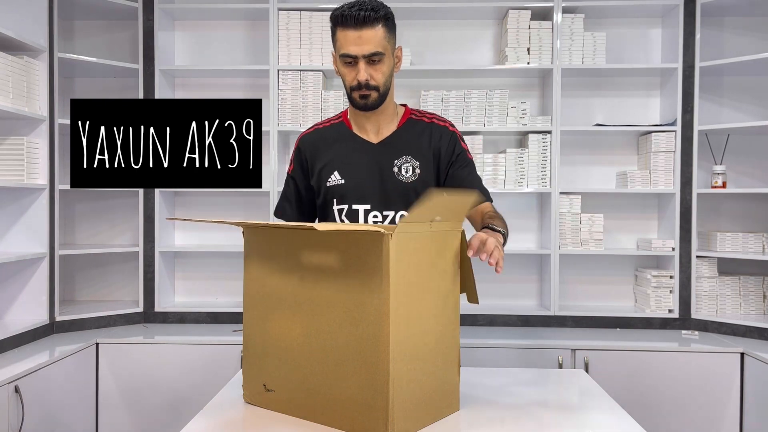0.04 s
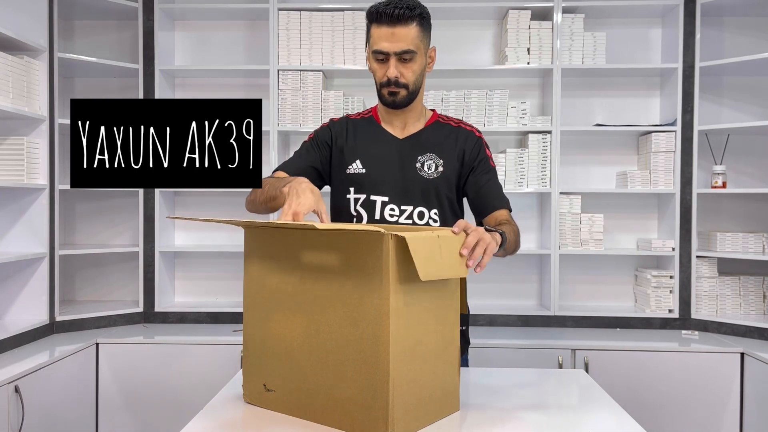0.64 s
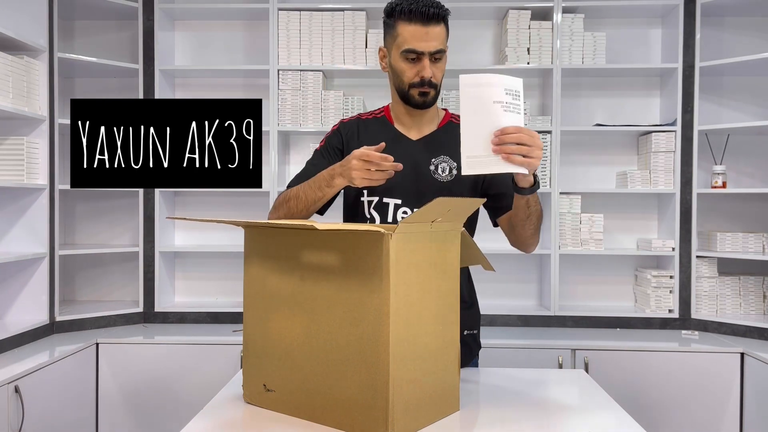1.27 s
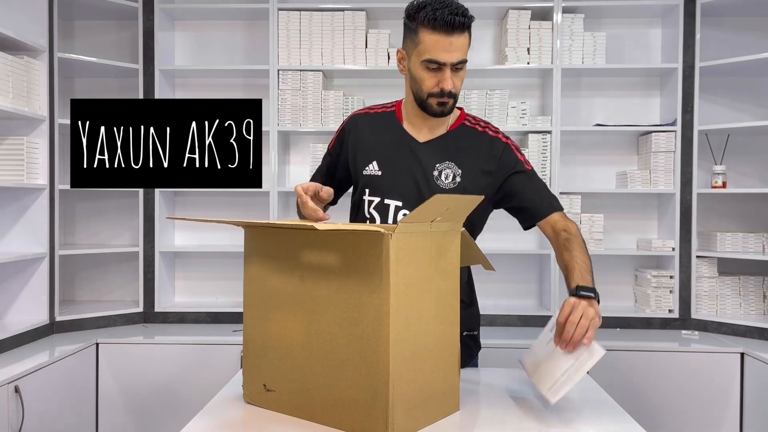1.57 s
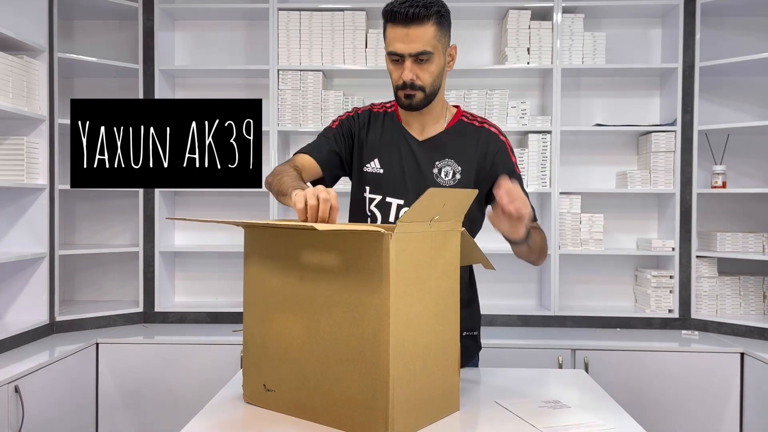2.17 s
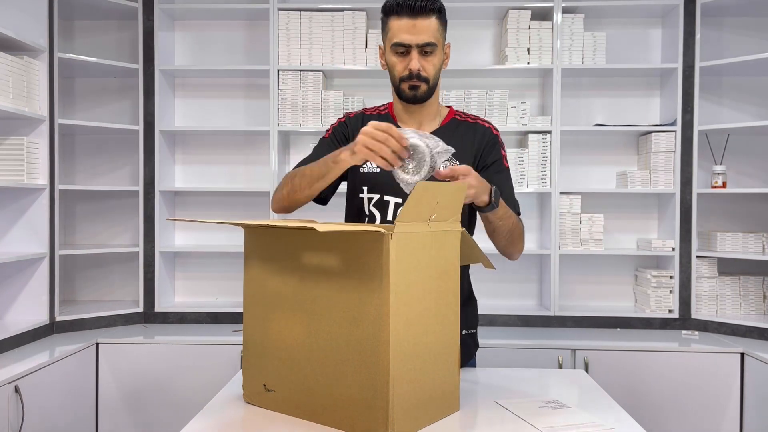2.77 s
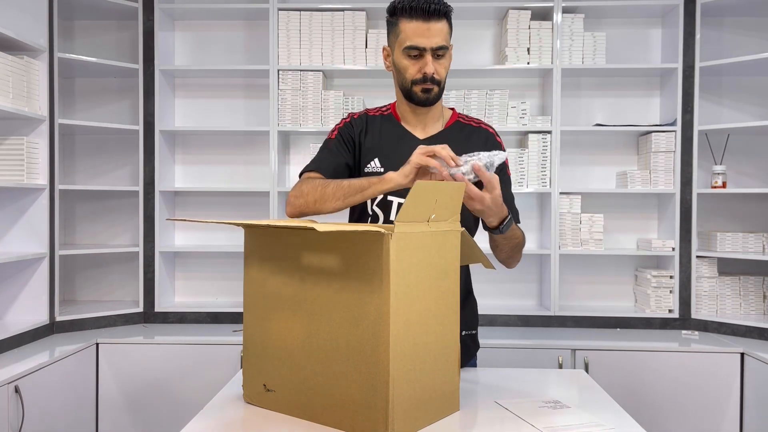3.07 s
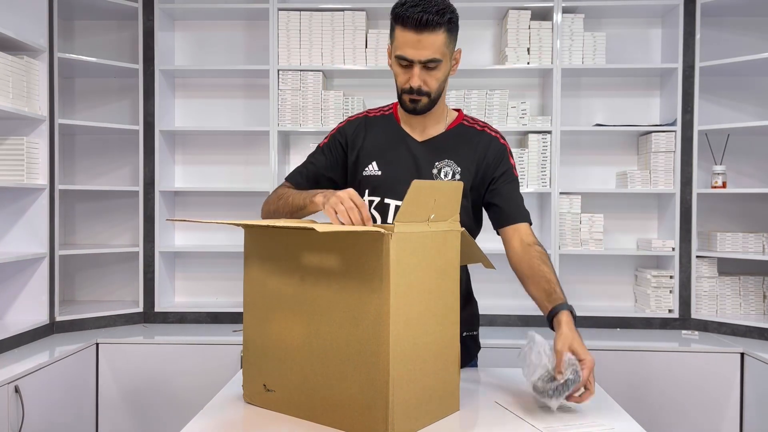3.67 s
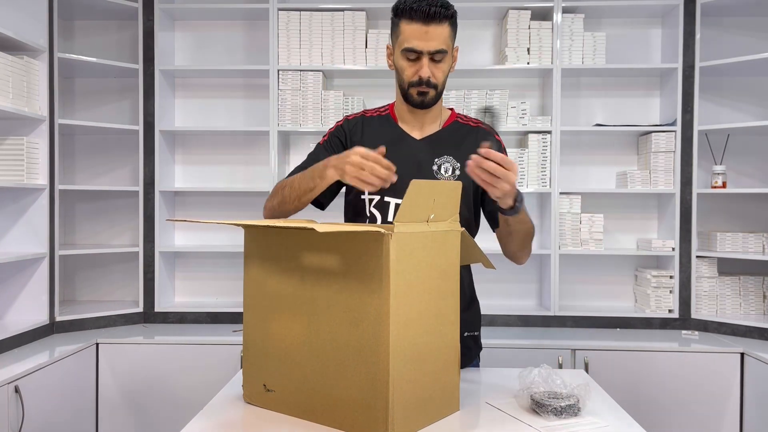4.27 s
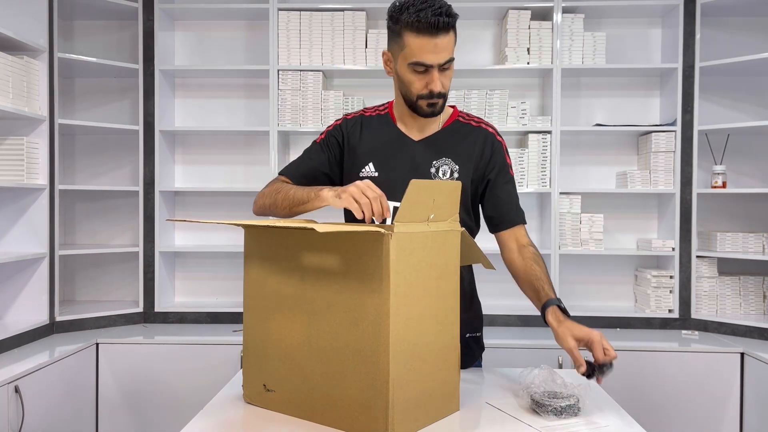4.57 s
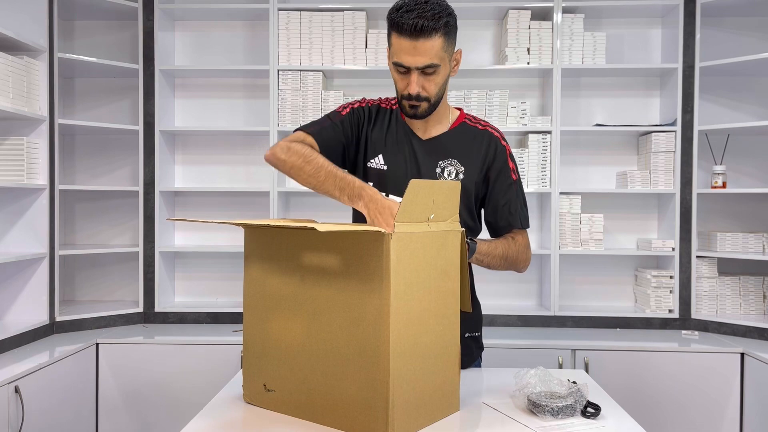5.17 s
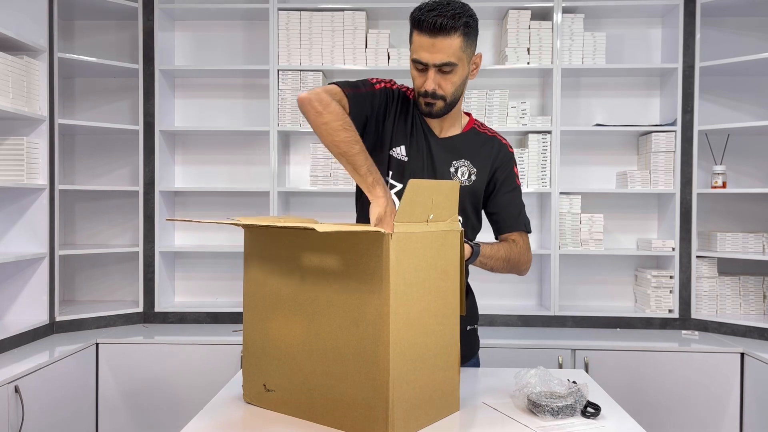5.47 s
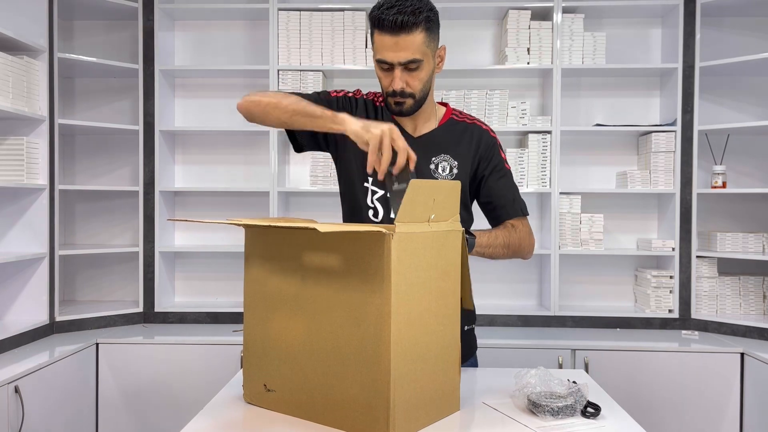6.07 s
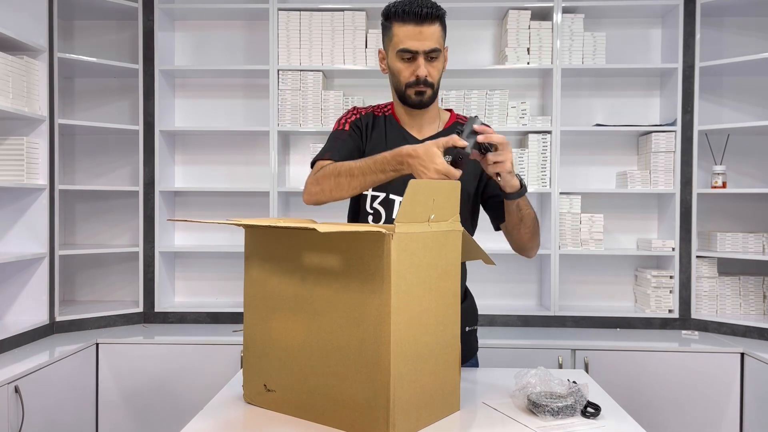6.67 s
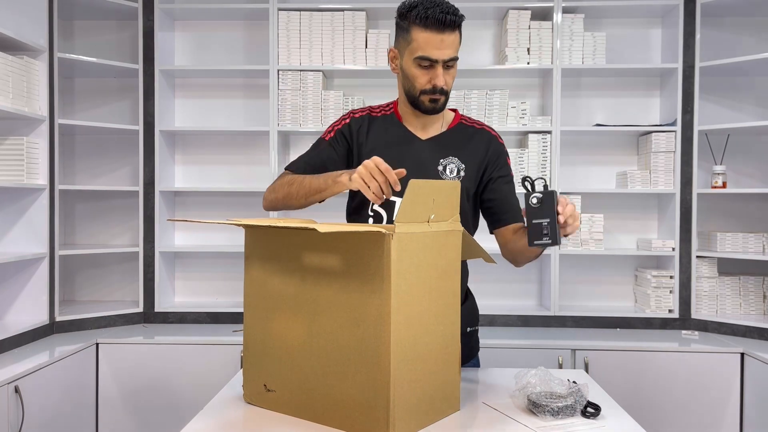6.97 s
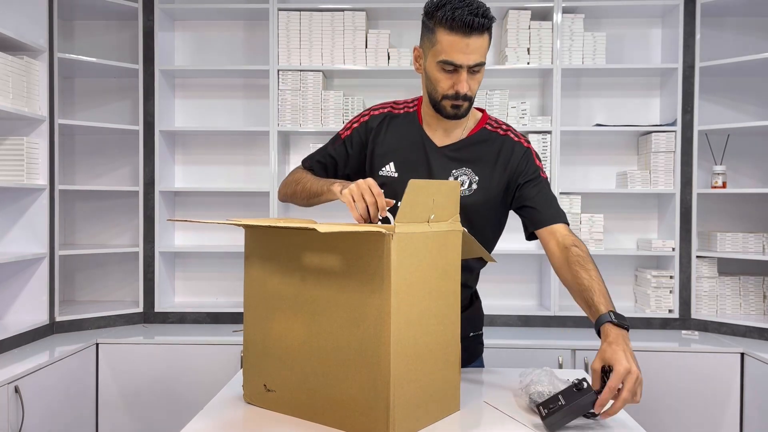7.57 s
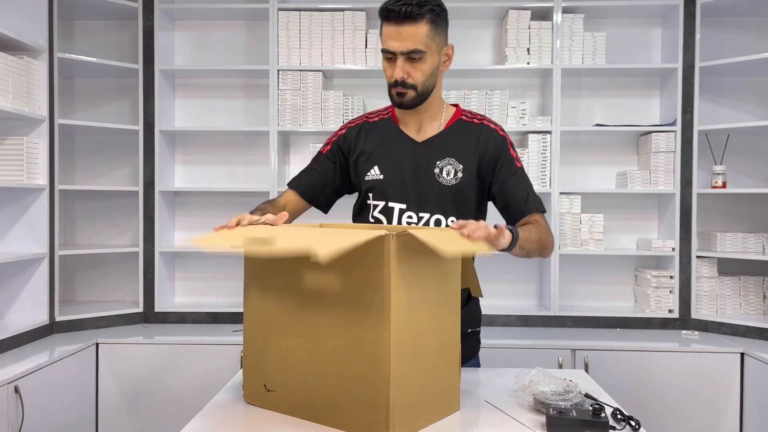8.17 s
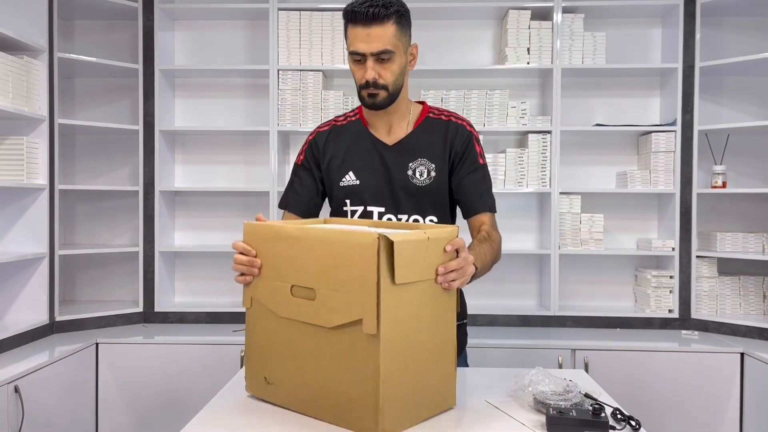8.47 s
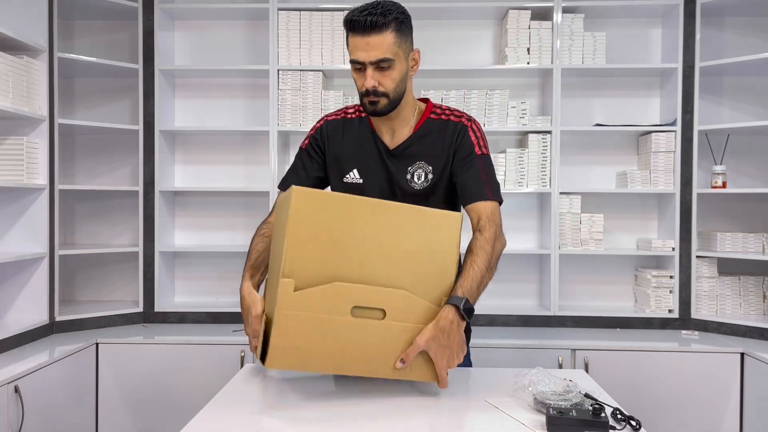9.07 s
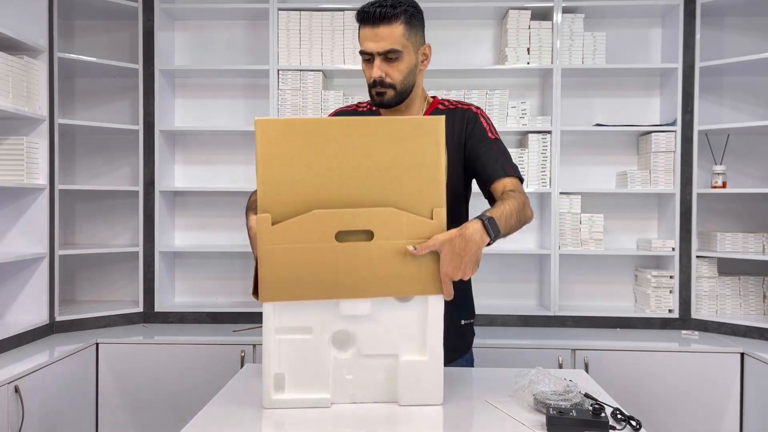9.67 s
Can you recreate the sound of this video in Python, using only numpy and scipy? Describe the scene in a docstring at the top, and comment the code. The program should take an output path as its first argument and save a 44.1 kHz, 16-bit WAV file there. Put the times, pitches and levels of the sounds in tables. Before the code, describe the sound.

A cardboard box is unpacked nearby in a small, hard-walled room, with a faint, low appliance hum throughout. Flaps snap and scrape during the first second, followed by light ticks and soft table bumps around 1.7 seconds. From 2.1 to 3.9 seconds a plastic bag rustles and crinkles, and the loudest knock comes at 3.7 seconds as a part lands on the table. Small clicks and bumps follow near 4.7 seconds. From 5 to 6.5 seconds cardboard rubs and scrapes with hollow knocks and a sharp snap at 6.2. Parts clunk onto the table several times between 7.4 and 7.8 seconds. From 8 seconds the card scrapes and slaps as the box is turned over, landing with a thud at 9.2. It then slides off its foam block with a dry hiss and faint high squeaks, ending with a tick near 9.9 seconds.

```python
"""A small, hard-walled shop with a humming appliance, where a cardboard box is unpacked on a table.
Flaps scrape by stick-slip friction and snap, ringing the box; a plastic bag rustles as its creases pop.
Parts are set down and send bending waves through the table top.
At last the box is turned over, lands with a thud and slides up off its foam block."""
import sys
import numpy as np
from scipy import signal
from scipy.fft import rfft, irfft, next_fast_len
from scipy.io import wavfile
from scipy.ndimage import uniform_filter1d

SR = 44100
rng = np.random.default_rng(int(sys.argv[2]) if len(sys.argv) > 2 else 0)


def bounce(signal):
    """Save signal as a 16-bit WAV file at the path given by the first command-line argument."""
    frames = np.transpose(np.atleast_2d(signal))
    limited = np.clip(frames, -1, 1)
    pcm = np.round(limited * 32767).astype(np.int16)
    wavfile.write(sys.argv[1], SR, pcm)


N = 437913
SIZE = 16384  # samples per impact or room response
T, F = np.arange(SIZE) / SR, np.arange(SIZE // 2 + 1) * SR / SIZE  # s, Hz


def undb(db):
    """Decibels to gain."""
    return 10 ** (np.asarray(db) / 20)


def unit(x):
    """Scale to rms 1."""
    return x / np.sqrt(np.mean(x ** 2))


def read(points, f):
    """A (Hz, value) table read on a log-frequency axis."""
    hz, value = np.transpose(points)
    return np.interp(np.log(f + 1e-3), np.log(hz), value)


def colour(x, points):
    """Filter by a (Hz, dB) table."""
    size = next_fast_len(x.shape[-1], True)
    gain = undb(read(points, np.arange(size // 2 + 1) * SR / size))
    return irfft(rfft(x, size) * gain, size)[..., :x.shape[-1]]


def causal(db):
    """Minimum-phase response of a gain curve: nothing sounds before the blow."""
    cepstrum = irfft(np.log(undb(db)))
    fold = 1 + np.sign(SIZE / 2 - np.arange(SIZE)) * (T > 0)
    return np.exp(rfft(cepstrum * fold))


def walk(rate_hz):
    """Smooth random wander, rms 1."""
    hold = int(SR / rate_hz)
    steps = np.repeat(rng.standard_normal(N // hold + 1), hold)
    return unit(uniform_filter1d(steps, hold)[:N])


def ringing(modes):
    """Response of a body: the blow itself plus its decaying modes."""
    return 1 + sum(undb(db) / (1 + 2j * np.pi * (F - hz) * t60 / np.log(1000)) for hz, db, t60 in modes)


# Diffuse field width. Each row: frequency in Hz, side minus mid in dB.
WIDTH = [(100, -8.5), (380, -10.5), (700, -6), (1300, 1.5), (2400, -1), (4400, -4), (12000, -3.5)]

def diffuse(mid, side):
    """Left and right of a diffuse field, alike in the bass."""
    side = colour(side, WIDTH)
    return np.array([mid + side, mid - side])


# Fan air spectrum. Each row: frequency in Hz, relative level in dB.
FAN_AIR = [(18, -78.5), (30, -58), (64, -19), (79, -18.5), (102, -1), (164, -13.5), (350, -17.5),
           (379, -16.5), (420, -8.5), (532, -19), (1300, -30), (1700, -37), (2700, -39.5), (3600, -53.5),
           (4500, -47.5), (5310, -61), (6600, -56.5), (7400, -50), (8700, -63), (15500, -64)]
# Hum lines. Each row: frequency in Hz, rms level in dB, waver relative to the steady tone.
HUM = [(100.6, -50, 0.12), (416, -57, 1.17), (932, -70, 0.6), (1190, -76.5, 2.5)]

def appliance(air_db=-50.5):
    """Dull fan air and a hum that wavers in level and phase."""
    air = unit(colour(diffuse(*rng.standard_normal((2, N))), FAN_AIR)) * undb(air_db)
    time, hum = np.arange(N) / SR, np.zeros(N)
    for hz, db, waver in HUM:
        drift = 1 + waver * (walk(14) + 1j * walk(12))
        hum += undb(db) * unit(np.real(drift * np.exp(2j * np.pi * hz * time)))
    return air + hum


# Room decay. Each row: frequency in Hz, T60 in seconds.
ROOM_T60 = [(150, 0.34), (600, 0.13), (2400, 0.25), (6000, 0.21), (14000, 0.17)]
# Stereo balance of table and box. Each row: frequency in Hz, left minus right in dB.
TABLE_BALANCE = [(100, 5.5), (320, 3), (600, 0.5), (1200, 6.5), (2400, -17.5)]
BOX_BALANCE = [(150, 1.5), (600, -4), (2400, -3.5), (6000, -0.6), (12000, 1.5)]

def room(balance, wet_db, first_wall_s=0.0018):
    """Yields responses from ever new spots: direct sound, then a dense tail, longest in the bass."""
    noise = rfft(diffuse(*rng.standard_normal((2, SIZE))))
    hz, t60 = np.transpose(ROOM_T60)
    bands = np.array([irfft(noise * read(list(zip(hz, band)), F)) for band in np.eye(len(hz))])
    fades = undb(-60 * T / t60[:, None]) * np.clip(T / first_wall_s - .5, 0, 1)
    sides = np.array([causal(sign * read(balance, F) / 2) for sign in (1, -1)])
    while True:
        tail = np.einsum("bct,bt->ct", np.roll(bands, rng.integers(SIZE), axis=2), fades)
        yield sides * rfft((T == 0) + undb(wet_db) * unit(tail) / np.sqrt(SIZE))


def moving(x, spots, spot_count=16, hop=1024):
    """A moving contact: successive moments reach the room from a cycle of spots."""
    responses = [next(spots) for _ in range(spot_count)]
    out = np.zeros((2, N + SIZE))
    x, window = np.pad(x, (0, 2 * hop)), np.hanning(2 * hop)
    for k, i in enumerate(range(0, N, hop)):
        moment = x[i:i + 2 * hop] * window
        if moment.any():
            out[:, i:i + SIZE] += irfft(rfft(moment, SIZE) * responses[k % spot_count])
    return out[:, :N]


def stroke(start_s, length_s, swell_share=0.41, ease_db_per_s=26.5, release_s=0.022):
    """Force of one stroke: swells, eases off, dies as the hand lets go."""
    force, first = np.zeros(N), max(int(start_s * SR), 0)
    age = np.arange(min(SR, N - first)) / SR
    swell = np.sin(np.pi / 2 * np.minimum(age / (swell_share * length_s), 1)) ** 2
    release = np.exp(-np.clip((age - length_s) / release_s, 0, 20))
    force[first:first + len(age)] = swell * undb(-ease_db_per_s * age) * release
    return force


def effort(strokes):
    """Scrape and hiss envelopes of a run of strokes, summed in power."""
    return np.sqrt(sum(np.outer(undb(levels_db), stroke(start_s, length_s)) ** 2
                       for start_s, length_s, *levels_db in strokes))


def friction(scrape, hiss, body, surface, slips_per_s, scatter_db, judder_db, snags_per_s, snag_db):
    """Uneven slips drive the body and hiss at the surface; each random snag lets go in a flurry."""
    slips = (rng.random(N) < slips_per_s / SR) * rng.choice([-1, 1], N)
    sizes = undb(scatter_db * np.minimum(rng.exponential(size=N), 5))
    snags, flurry_s = rng.random(N) < snags_per_s / SR, 0.0046
    flurries = signal.lfilter([1], [1, -np.exp(-1 / (flurry_s * SR))], snags)
    slips = slips * sizes * undb(judder_db * walk(70)) * (1 + undb(snag_db) * flurries)
    return scrape * unit(colour(slips, body)) + hiss * unit(colour(slips, surface))


def pops(low_hz, high_hz, per_s, ring_cycles, scatter_db, size=512):
    """Creases or fibres let go one by one, each at its own pitch."""
    out = np.zeros(N + size)
    for when, pitch, chance in rng.random((int(per_s * N / SR), 3)):
        cycles = T[:size] * low_hz * (high_hz / low_hz) ** pitch
        gain = undb(scatter_db * min(-np.log(chance), 3))
        i = int(when * N)
        out[i:i + size] += gain * np.sin(2 * np.pi * cycles) * np.exp(-cycles / ring_cycles)
    return unit(out[:N])


# Tight surfaces sliding. Each row: start in seconds, length in seconds, pitch in Hz, level in dB.
SQUEAKS = [(3.544, .03, 4300, -61.5), (5.836, 0.02, 5360, -65), (8.562, 0.035, 7700, -63),
           (9.68, 0.083, 9100, -56.5), (9.837, .015, 6900, -58)]

def squeaks(relative_bandwidth=0.3):
    """Where a surface grips tightly, its friction gathers in one resonance."""
    out, slips = np.zeros(N), rng.standard_normal(N)
    for start_s, length_s, hz, db in SQUEAKS:
        peak = signal.iirpeak(hz, 1 / relative_bandwidth, fs=SR)
        tone = unit(signal.lfilter(*peak, signal.lfilter(*peak, slips)))
        out += undb(db) * stroke(start_s, length_s) * tone
    return out


# Bag handling. Each row: start in seconds, length in seconds, scrape in dB, hiss in dB.
BAG_RUBS = [(2.13, 0.13, -52, -68.5), (2.24, 0.29, -46.5, -58), (2.35, 0.086, -47, -67),
            (2.48, 0.25, -61, -62.5), (2.72, 0.29, -65, -66), (2.85, 0.11, -66, -61),
            (2.93, 0.37, -69, -64), (3.43, 0.17, -79, -67), (3.55, 0.025, -72, -59),
            (3.58, 0.081, -61, -63), (3.74, 0.066, -79, -64), (3.853, 0.027, -50.5, -69)]
# Bag scrape and hiss spectra. Each row: frequency in Hz, gain in dB.
BAG_BODY = [(100, -12), (300, 10.5), (700, 11), (1400, 0.5), (2200, 2.5), (3200, -2.5), (6000, -31)]
BAG_HISS = [(1500, -20), (3500, 2), (7500, 5.5), (10000, 1.5), (13500, 1.5), (15500, -20)]

def plastic_bag():
    """The film rubs and its creases pop."""
    scrape, hiss = effort(BAG_RUBS)
    rub = friction(scrape, hiss, BAG_BODY, BAG_HISS,
                   slips_per_s=1800, scatter_db=0.5, judder_db=2.5, snags_per_s=22, snag_db=-13)
    creases = pops(low_hz=3200, high_hz=14400, per_s=85, ring_cycles=2, scatter_db=10)
    return rub + hiss * undb(-4) * creases


# Hands and parts on card. Each row: start in seconds, length in seconds, scrape in dB, hiss in dB.
CARD_RUBS = [(.17, 0.17, -58, -62), (.355, 0.016, -68, -58.5), (.44, 0.0046, -67, -63.5),
             (.56, 0.075, -52.5, -69.5), (.64, 0.14, -59, -71.5), (1.485, .062, -69, -68.5),
             (1.57, 0.1, -70, -76), (4.38, 0.025, -59, -84), (4.855, 0.029, -66, -66.5),
             (4.92, .16, -58, -73), (5.08, 0.032, -46.5, -64), (5.205, 0.15, -45, -59),
             (5.37, .2, -47.5, -64), (5.61, 0.09, -44, -55), (5.7, 0.084, -49.5, -64),
             (5.8, 0.092, -57, -71.5), (5.94, 0.098, -42.5, -57.5), (6.08, 0.13, -51, -64),
             (6.34, 0.33, -59, -101), (7.52, 0.27, -66, -66.5), (8.04, 0.31, -55.5, -62),
             (8.23, .1, -55, -57.5), (8.29, 0.036, -45, -60), (8.35, 0.19, -56, -60.5),
             (8.575, 0.096, -55.5, -55.5), (8.66, .14, -51.5, -67), (8.79, 0.038, -60, -58.5),
             (8.862, 0.099, -47.5, -57), (8.98, 0.11, -51.5, -60), (9.08, 0.12, -51, -57),
             (9.15, 0.08, -57, -50.5)]
# Card scrape and hiss spectra. Each row: frequency in Hz, gain in dB.
CARD_BODY = [(70, -48), (135, 4.5), (300, 5), (450, 4.5), (720, -1), (1100, -4), (1500, -11.5),
             (2200, -13.5), (3500, -24), (7000, -56)]
CARD_HISS = [(1200, 2), (3000, 7), (5000, 4.5), (8000, 1), (12000, -4), (15500, -13)]
# Box panels and hollow. Each row: frequency in Hz, gain in dB, T60 in seconds.
BOX_MODES = [(132, 15, 0.45), (341, 4.5, 0.035), (418, -8, 0.1), (595, 4.5, 0.078), (736, 5, 0.098),
             (890, -3.5, 0.19), (1013, 1, 0.037), (1219, -1, 0.038), (1500, -15, .18), (1980, -3, 0.023)]

def cardboard():
    """Rubbing rings the box while fibres of the card catch."""
    scrape, hiss = effort(CARD_RUBS)
    rub = friction(scrape, hiss, CARD_BODY, CARD_HISS,
                   slips_per_s=3000, scatter_db=1.5, judder_db=3.5, snags_per_s=20, snag_db=-5.5)
    box = signal.oaconvolve(rub, irfft(ringing(BOX_MODES)))[:N]
    fibres = pops(low_hz=450, high_hz=3030, per_s=220, ring_cycles=3.5, scatter_db=2.5)
    return box + scrape * undb(-5.5) * fibres


# Box on foam. Each row: start in seconds, length in seconds, scrape in dB, hiss in dB.
FOAM_RUBS = [(9.204, 0.016, -35, -57), (9.23, 0.21, -47, -51), (9.39, 0.3, -53, -50),
             (9.57, 0.27, -52, -52.5), (9.8, 0.14, -52, -62.5)]
# Foam hiss spectrum. Each row: frequency in Hz, gain in dB.
FOAM_HISS = [(1200, 1), (3000, -0.5), (5500, -2), (9200, -2.5), (13000, -4), (15500, -9.5)]

def foam_slide():
    """The box slides off its foam block in very dense slips."""
    return friction(*effort(FOAM_RUBS), CARD_BODY, FOAM_HISS,
                    slips_per_s=16000, scatter_db=3, judder_db=1, snags_per_s=31, snag_db=-11)


def contact(cut_hz):
    """A contact of finite duration excites little above its cut-off."""
    return causal(-10 * np.log10(1 + (F / cut_hz) ** 4))


def spray(decay_s, rise_share=0.28):
    """Spectrum of tiny contacts that build as the surfaces meet, then die away."""
    age = T / max(decay_s, 1e-4)
    return rfft(rng.standard_normal(SIZE) * np.exp(-age) * (1 - np.exp(-age / rise_share)))


def add(track, start_s, spectrum, dry_peak_db, response):
    """Mix in an impact, heard through a room response."""
    start = max(int(start_s * SR), 0)
    heard = irfft(spectrum * response)[:, :N - start]
    track[:, start:start + heard.shape[1]] += heard * undb(dry_peak_db) / np.abs(irfft(spectrum)).max()


# Snaps and slaps of card, paper and plastic. Each row: start in seconds, ring in dB, ring pitch in Hz,
# tick in dB, spray decay in seconds, ring Q.
SNAPS = [(0.0334, -30.5, 1180, -32, 0.0028, 6.1), (.0343, -30, 3740, -46, 0.00087, 3.9),
         (.034, -23, 7440, -28, 0.0013, 2.3), (.043, -35, 1200, -36, 0.0021, 3),
         (.042, -35, 1920, -67, 0.0031, 5.8), (.217, -42, 2170, -42.5, 0.0085, 11),
         (.59, -36, 770, -50, 0.016, 1.2), (1.005, -42, 1010, -48, .026, 2.4),
         (1.044, -42.5, 2570, -43, .013, 1.9), (1.107, -44, 1010, -51, 0.0088, 1),
         (1.669, -52, 2300, -29, 0.013, 2), (1.686, -60, 2210, -26, 0.01, 2),
         (2.126, -39.5, 1810, -46.5, 0.0058, 1.6), (2.142, -46, 5700, -43, 0.0064, 2),
         (3.719, -37, 2220, -26, 0.0024, 3), (3.968, -34, 880, -39.5, 0.026, 0.67),
         (4.686, -35, 4370, -40.5, 0.0037, 1.6), (4.705, -41, 3070, -32.5, 0.0059, 1.7),
         (4.938, -36, 860, -48, 0.0022, 1.8), (4.973, -42, 750, -52, 0.0073, 5.5),
         (4.999, -42, 1000, -62, 0.0018, 3), (5.103, -40, 1010, -42.5, .0072, 2.5),
         (5.327, -34.5, 1180, -44, 0.005, 3.2), (5.42, -51, 1040, -47, 0.0035, 2.3),
         (5.454, -38, 980, -58, 0.0032, 5.9), (5.483, -29.5, 880, -36, 0.002, 3.2),
         (5.536, -34, 685, -46, 0.0033, 1.3), (5.683, -35, 800, -47, 0.0036, 1.5),
         (6.025, -29, 1060, -40, 0.0047, 2), (6.067, -30, 880, -51, 0.017, 0.71),
         (6.146, -29, 1080, -38.5, 0.0055, 1.6), (6.1938, -15.5, 1080, -60, 0.0015, 2.56),
         (6.194, -24.5, 550, -67, .0013, 1.8), (6.2, -36, 2200, -59, 0.016, 2.6),
         (6.21, -27.5, 780, -58, 0.0045, 3.3), (6.611, -66, 1890, -52, 0.0081, 2),
         (7.342, -49.5, 7360, -52, 0.0041, 2), (7.634, -31, 2220, -60, 0.0046, 2),
         (7.8055, -21.5, 4360, -26, 0.002, 2.2), (7.808, -20, 1200, -50, 0.0058, 1.3),
         (7.816, -20, 2400, -44, 0.0018, 1.7), (8.14, -41, 1300, -59, 0.0038, 1.2),
         (8.414, -48, 2000, -30.5, 0.0059, 2), (8.4203, -26, 900, -31, 0.0059, 1.4),
         (8.419, -35.5, 2050, -52, 0.005, 9.7), (8.604, -39, 834, -55, 0.0025, 2.8),
         (8.669, -35, 730, -55, 0.0023, 1.7), (8.768, -32.5, 700, -46.5, 0.02, 0.94),
         (8.935, -32.5, 526, -48, 0.016, 1.3), (9.133, -37, 626, -48, .003, 2.4),
         (9.228, -22, 131, -63, 0.0086, 1.06), (9.356, -37, 670, -55, 0.0033, 3),
         (9.391, -33.5, 620, -31, 0.0042, 2.4), (9.903, -42, 2400, -36.5, 0.0048, 1.5)]
# Tick spectrum. Each row: frequency in Hz, gain in dB.
TICK_COLOUR = [(300, 4.5), (1000, 1), (2400, 5), (4500, -1), (7500, -5.5), (11000, -12.5), (15500, -15)]

def snaps(first_contact_db=14, tick_decay_share=0.8, light_hz=7500, light_db=-45, hardening=0.65):
    """A clean contact, then a spray, rings a panel and the box; the tick is brighter when harder."""
    out = np.zeros((2, N))
    tick, box = causal(read(TICK_COLOUR, F)), ringing(BOX_MODES)
    spots = room(BOX_BALANCE, wet_db=-2.5)
    for (start_s, ring_db, ring_hz, tick_db, decay_s, q), spot in zip(SNAPS, spots):
        s = 1j * F / ring_hz
        panel = (s / q / (1 + s / q + s * s)) ** 2
        add(out, start_s, box * panel * (undb(first_contact_db) + spray(decay_s)), ring_db, spot)
        cut_hz = light_hz * undb(hardening * (tick_db - light_db))
        add(out, start_s, tick * contact(cut_hz) * spray(decay_s * tick_decay_share), tick_db, spot)
    return out


# Blows on the table. Each row: start in seconds, thud in dB, contact cut-off in Hz, path through the top
# in metres, mode gain in dB (lower for a part held down), thud pitch in Hz.
KNOCKS = [(0.04, -33.5, 900, 0.74, 3, 344), (0.086, -37.5, 400, 1.08, 6, 360),
          (.272, -35, 353, 0.99, -6, 328), (1.672, -32.5, 500, 0.71, 5, 327),
          (1.763, -24.5, 235, 1.05, 1, 332), (1.915, -28.5, 332, 0.83, 3, 320),
          (3.7178, -5.5, 1190, 0.8, -0.5, 319), (3.743, -22.5, 300, 1.11, -2, 330),
          (4.687, -30, 400, 1.1, 0, 340), (4.716, -26, 322, 0.78, 5, 347), (4.867, -32, 330, 1.08, 10, 354),
          (5.099, -36, 400, 0.95, 4, 340), (5.136, -32.5, 259, 0.71, 12, 360),
          (5.283, -18.5, 500, 0.73, -3, 348), (5.3, -28, 300, 0.73, 0, 340),
          (5.978, -25, 895, 0.54, -6, 388), (5.985, -20, 566, 0.87, -1, 352),
          (7.415, -14, 970, 1.05, 2.5, 300), (7.421, -24, 190, 0.92, -7, 302),
          (7.4785, -19.5, 674, .98, -5, 293), (7.633, -13, 930, 0.96, 9, 321),
          (7.737, -29, 290, 1.17, -7, 340), (7.8047, -11, 900, .82, 4, 315),
          (7.823, -30, 200, 0.6, -2, 300), (7.983, -23.5, 300, 0.64, -1.5, 330),
          (8.139, -28, 450, 0.91, 0, 380), (8.157, -28.5, 300, 0.76, 9, 318),
          (8.285, -31, 400, 0.83, 5, 368), (8.31, -32, 400, 0.91, -2, 377), (8.326, -30, 350, 0.81, 5, 328),
          (9.206, -21, 670, 0.97, 6, 352), (9.221, -12, 377, 1.14, -6, 344),
          (9.236, -14.5, 318, 0.95, 5, 345), (9.25, -19.5, 200, 1.03, -13, 340)]
# Spectra of the table's thud and the part's clack. Each row: frequency in Hz, gain in dB.
THUD_COLOUR = [(40, -55), (90, -22.5), (130, -12.5), (175, -2.5), (250, 0), (310, 8), (365, 9), (435, -9),
               (560, 0.5), (750, -6.5), (1050, -8), (1400, -18.5), (2200, -35.5)]
CLACK_COLOUR = [(300, -16), (700, 17.5), (1200, 14.5), (1700, 2), (2500, -1), (4500, -31), (7000, -23),
                (15500, -55)]
# Table modes. Each row: frequency in Hz, gain in dB, T60 in seconds.
TABLE_MODES = [(97, -12, .5), (131, -12, .35), (195.7, 10.5, 0.16), (248, -7.5, 0.2), (275, 1.5, 0.069),
               (340, -5.5, 0.037), (353.8, -1.5, 0.14), (541, 0, 0.098), (582, -4, 0.076), (709, 7, 0.11),
               (809, 4.5, 0.071), (985, 6.5, 0.069), (1180, 6.5, .07)]

def table_knocks(wave_m_per_s=78, pivot_hz=300, dispersion=1.25, base_thud_hz=340, hard_hz=900):
    """Bending waves carry treble first and bass last, so each blow chirps down into the table's modes."""
    delay_s_per_m = (pivot_hz / np.maximum(F, 100)) ** dispersion / wave_m_per_s
    phase_per_m = 2 * np.pi * np.cumsum(delay_s_per_m) * SR / SIZE
    modes = ringing(TABLE_MODES) - 1
    edge_echo = 1 + undb(-17) * np.exp(-2j * np.pi * F * 0.01356)  # back from the far edge
    out, clack = np.zeros((2, N)), causal(read(CLACK_COLOUR, F))
    thud_spots, clack_spots = room(TABLE_BALANCE, wet_db=-6.5), room(BOX_BALANCE, wet_db=-9.5)
    for start_s, thud_db, contact_hz, path_m, ring_db, thud_hz in KNOCKS:
        plate = causal(read(THUD_COLOUR, F * base_thud_hz / thud_hz))  # shifted by spot and load
        wave = plate * edge_echo * contact(contact_hz) * np.exp(-1j * phase_per_m * path_m)
        add(out, start_s, wave * (1 + undb(ring_db) * modes), thud_db, next(thud_spots))
        clack_db = thud_db - 20 + 12 * np.log2(contact_hz / hard_hz)  # a harder contact clacks more
        add(out, start_s, clack * spray(decay_s=0.015), clack_db, next(clack_spots))
    return out


def scene():
    """Table, box, bag and foam sound into one room over the appliance."""
    card, bag, foam = cardboard(), plastic_bag(), foam_slide()
    rustle = moving(bag, room(BOX_BALANCE, wet_db=-1))  # held in the open: more direct sound
    impacts = table_knocks() + snaps()
    sliding = moving(card + foam + squeaks(), room(BOX_BALANCE, wet_db=3.5))
    return appliance() + rustle + sliding + impacts


def record(dry):
    """Steep low-pass at 15.9 kHz."""
    return signal.sosfilt(signal.ellip(10, .2, 70, 15900, fs=SR, output="sos"), dry)


dry = scene()
out = record(dry)
bounce(out)
```